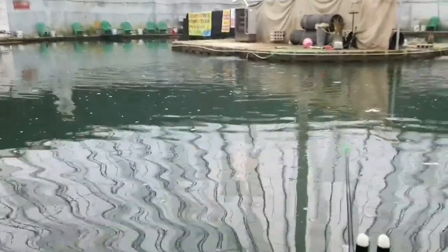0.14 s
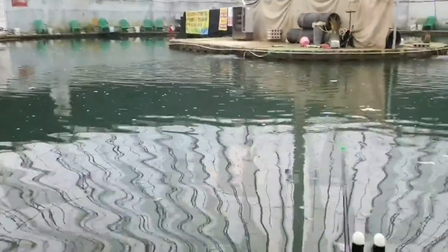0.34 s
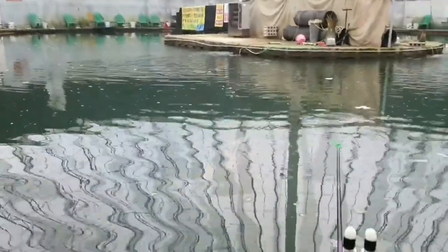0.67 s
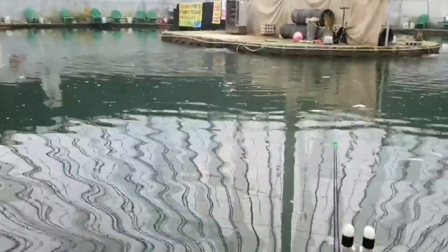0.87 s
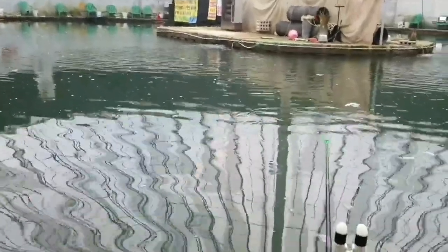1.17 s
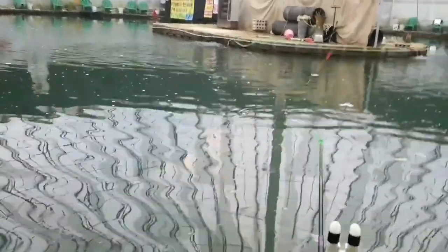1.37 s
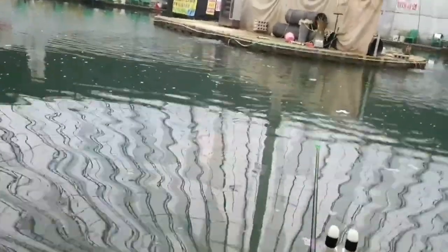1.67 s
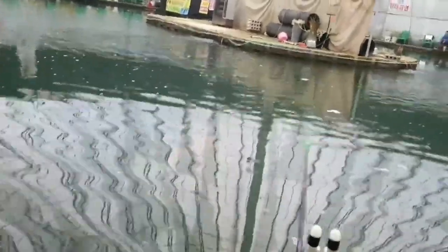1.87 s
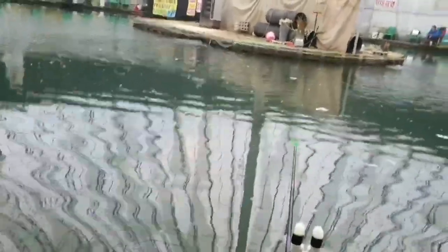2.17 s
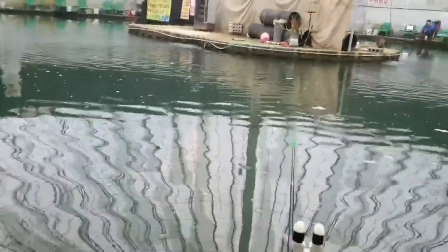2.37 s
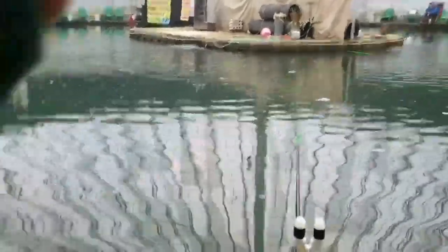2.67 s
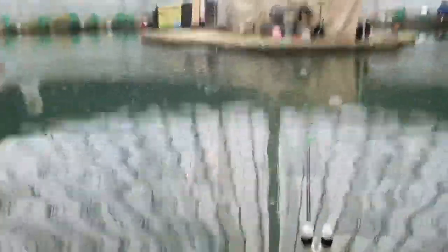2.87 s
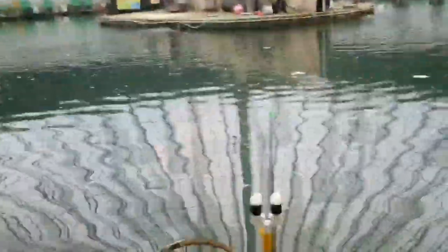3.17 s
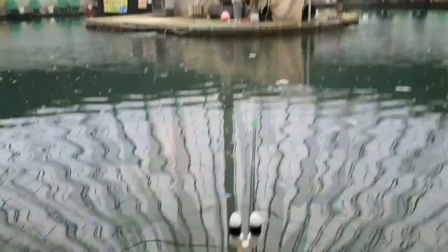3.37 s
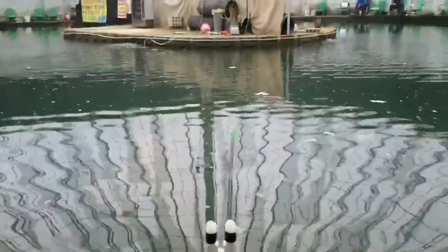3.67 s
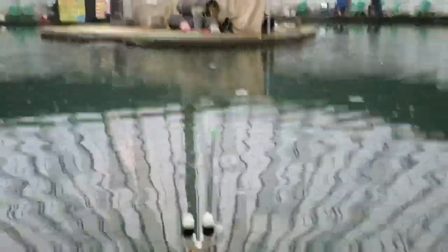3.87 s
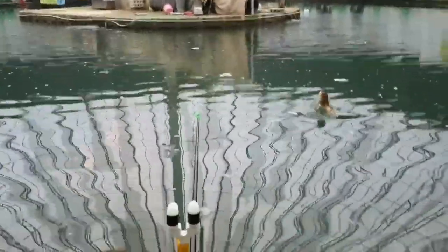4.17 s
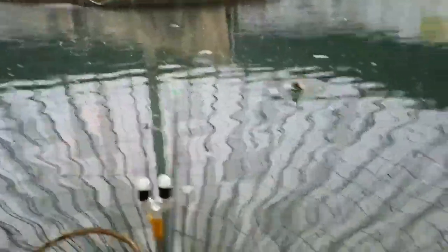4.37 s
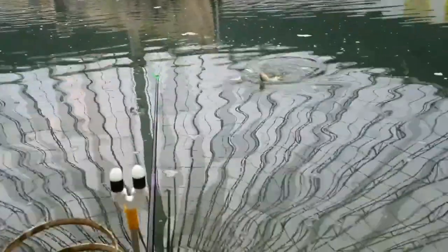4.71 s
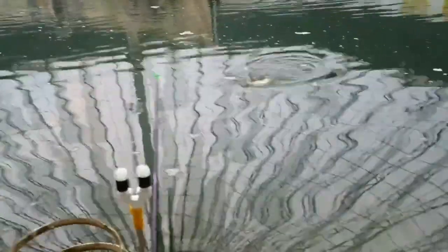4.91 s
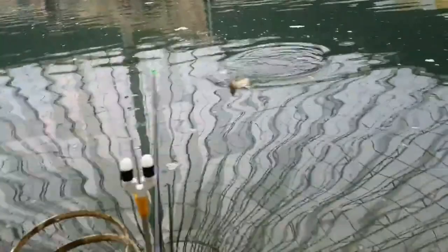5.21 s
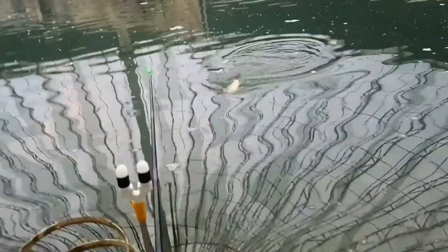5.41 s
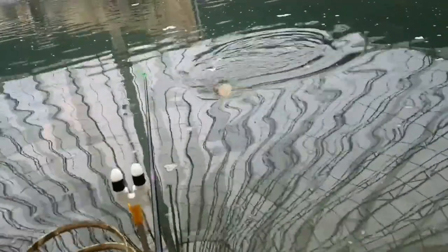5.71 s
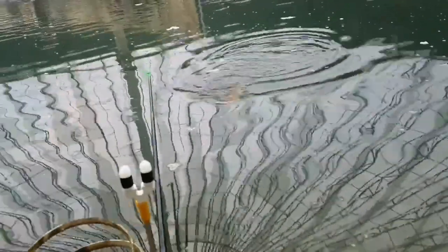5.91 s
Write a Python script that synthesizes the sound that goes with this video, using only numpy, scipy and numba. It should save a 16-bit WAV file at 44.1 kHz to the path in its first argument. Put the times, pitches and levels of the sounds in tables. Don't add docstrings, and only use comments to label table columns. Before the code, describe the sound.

Steady motor hum with watery gurgles and close gulps; a rod handle clacks hard on its wooden stand, a fish flicks water, and drips fall.

```python
import sys
import numpy as np
from scipy import signal
from scipy.fft import rfft, irfft, next_fast_len
from scipy.io import wavfile
from scipy.ndimage import uniform_filter1d
from numba import njit

SR = 44100
rng = np.random.default_rng(int(sys.argv[2]) if len(sys.argv) > 2 else 0)


def makeup_ratio(level_db):
    decades = np.asarray(level_db, float) / 20
    return 10 ** decades


def output_pcm(signal):
    pcm = np.clip(np.atleast_2d(signal).T, -1, 1) * 32767
    wavfile.write(sys.argv[1], SR, np.round(pcm).astype(np.int16))


N = 266820
T = np.arange(N) / SR

# (time [s], left level [dB], right level [dB], bass level [dB])
BLOWS = [
    (3.9123, -12, 5, -1.5),
    (3.9149, 4.5, 11.5, 2),
    (3.919, 7, -41.5, 3.5),
    (3.9219, -50.5, -3, -1.5),
    (3.9263, -6.5, -55.5, -15.5),
    (3.9375, -26.5, -46, -14.5),
]
DRIP_RISE = 1.12


def unit(x):
    return x / np.sqrt(np.mean(x ** 2))


def walk(rate_per_s):
    k = int(SR / rate_per_s)
    held = np.repeat(rng.standard_normal(N // k + 1), k)
    return unit(uniform_filter1d(uniform_filter1d(held, k), k)[:N])


def course(table):
    db = np.interp(T, *np.transpose(table))
    return db - db.mean()


def bell(t, rise_s, fall_s):
    return np.exp(-np.where(t < 0, t / rise_s, t / fall_s) ** 2)


def bumps(rows, rise_s, fall_s):
    s, height_db = np.transpose(rows)[:2, :, None]
    coarse = T[::64]
    return np.interp(T, coarse, (height_db * bell(coarse - s, rise_s, fall_s)).sum(0))


def on_log(table, hz):
    f, v = np.transpose(table)
    return np.interp(np.log(hz), np.log(f), v)


@njit
def chirps(start, size, hz0, hz1, length, n):
    out = np.zeros((2, n))
    for k in range(len(start)):
        phase = 0.
        for i in range(min(int(1.6 * length[k]), n - start[k])):
            u = i / length[k]
            phase += 2 * np.pi * hz0[k] * (hz1[k] / hz0[k]) ** u / SR
            y = np.sin(phase) * min(9 * u, 1.) * np.exp(-2.5 * u ** 3)
            out[0, start[k] + i] += size[k, 0] * y
            out[1, start[k] + i] += size[k, 1] * y
    return out


def bubbles(rows):
    s, db, hz0, hz1, length_s, pan_db = np.transpose(rows)
    size = makeup_ratio(db - 3.5 + np.outer([.5, -.5], pan_db)).T
    return chirps((s * SR).astype(np.int64), size.copy(), hz0.copy(), hz1.copy(), length_s * SR, N)


def air(gain):
    # (pitch [Hz], level [dB])
    side_db = [(60, -14), (110, -22.5), (200, -12.5), (370, -21.5), (690, -6.5), (1270, -2), (2330, -0.5),
               (4290, -1), (7890, 0.5), (14500, 0.5)]
    right_lag_s = 0.00012
    n = next_fast_len(N)
    hz = np.maximum(np.fft.rfftfreq(n, 1 / SR), 1)
    mid, side = rfft(rng.standard_normal((2, n))) * gain(hz)
    side = side * makeup_ratio(on_log(side_db, hz))
    return hz, np.array([mid + side, (mid - side) * np.exp(-2j * np.pi * hz * right_lag_s)])


def ringing(centre_hz, width_hz):
    spectrum = air(lambda f: 1 / (1 + (2 * (f - centre_hz) / width_hz) ** 2))[1]
    return unit(irfft(spectrum, next_fast_len(N))[:, :N])


def breathing_bands(colour, shared_db, own_db, own_per_s):
    lo_hz, hi_hz = colour[0][0], colour[-1][0]
    hz, spectrum = air(lambda f: makeup_ratio(on_log(colour, f)) * (f > lo_hz) * (f < hi_hz))
    out = []
    for centre_hz in lo_hz * 2 ** np.arange(0, np.log2(hi_hz / lo_hz) + .5, .5):
        share = np.clip(1 - 2 * np.abs(np.log2(hz / centre_hz)), 0, 1)
        band = irfft(spectrum * share, next_fast_len(N))[:, :N]
        out.append((centre_hz, band * makeup_ratio(shared_db + own_db * walk(own_per_s))))
    return out


def knock():
    # (pitch [Hz], t60 [s], left level [dB], right level [dB])
    stand = [(78.7, .25, -10, -10.5), (84.3, .047, -7.5, -8.5), (179.6, .149, -24, -27.5),
             (232.9, .122, -24, -21), (263.8, .078, -15.5, -27), (494.5, .049, -5, -.5),
             (493.6, .061, -10, -5), (627.5, .026, -11.5, -9), (760, .055, -34.5, -20.5),
             (754.3, .031, -17.5, -15), (705.4, .005, -6.5, -2), (1211.4, .007, -26, -22.5),
             (49, .046, -28.5, -43), (266.6, .07, -14, -20), (146.1, .112, -30.5, -27.5),
             (962, .035, -31, -37), (499.2, .03, -30.5, -12), (1137, .05, -30, -36), (1335, .035, -33, -35),
             (1470, .03, -38, -39), (1587, .03, -37, -38), (1755, .02, -38, -28), (2055, .014, -31, -31),
             (2345, .02, -36, -30), (2636, .016, -25, -25), (3100, .01, -43, -42)]
    contact_s, hardness, knock_db = .00066, 1.98, .5
    bass_hz, left_lag_s = 330, .00035
    t = np.arange(int(.4 * SR)) / SR
    push = np.sin(np.pi * np.clip(t[:300] / contact_s, 0, 1)) ** hardness
    low = np.array(stand)[:, 0] < bass_hz
    out = np.zeros((2, N))
    for port, lag_s in enumerate((left_lag_s, 0)):
        rings = []
        for k, (hz, t60_s, *mode_db) in enumerate(stand):
            swing = np.sin(2 * np.pi * hz * t) * 1000. ** (-t / t60_s)
            rings.append((-1) ** k * makeup_ratio(mode_db[port]) * swing)
        for s, *blow_db, bass_db in BLOWS:
            ring = np.where(low, makeup_ratio(bass_db), makeup_ratio(blow_db[port])) @ np.array(rings)
            i = round((s + lag_s) * SR)
            out[port, i:i + len(t)] += makeup_ratio(knock_db) * np.convolve(ring, push / push.sum())[:len(t)]
    return out


def crack(left_db, right_db, low_hz, high_hz, rise_s, t60_s):
    t = np.maximum(T - BLOWS[0][0], 0)
    band = signal.butter(2, [low_hz, high_hz], "band", fs=SR, output="sos")
    noise = unit(signal.sosfilt(band, rng.standard_normal((2, N))))
    return makeup_ratio([[left_db], [right_db]]) * noise * np.minimum(t / rise_s, 1) * 1000. ** (-t / t60_s)


def splashes():
    # (time [s], level [dB], centre [Hz], width [Hz], fall [s])
    thrown = [(.51, -59, 9400, 9000, .013), (0.511, -59, 1000, 700, 0.05), (1.8, -68, 2800, 1500, 0.12),
              (2.075, -61, 11500, 4000, .006), (2.264, -56, 700, 500, 0.0044),
              (2.29, -58.5, 9000, 8000, 0.032), (3.385, -62, 12000, 4000, .005),
              (3.536, -55, 1100, 1000, 0.0052), (4.225, -59, 9000, 8000, .003),
              (4.382, -49.5, 3000, 2400, .0025), (4.437, -50, 11000, 7000, 0.0022),
              (4.467, -45, 3400, 3400, 0.0015), (4.481, -53, 6000, 9000, .008),
              (4.493, -50, 9000, 10000, 0.016), (4.505, -57, 7050, 10000, .005),
              (4.644, -48.5, 6300, 2800, 0.004), (4.651, -51, 4800, 2000, .004),
              (4.648, -54, 2100, 900, 0.0027), (4.702, -55, 3000, 2000, .004),
              (4.738, -54, 3200, 2600, .004), (4.765, -59, 3600, 1200, .006), (4.83, -59, 3200, 1200, .004),
              (4.685, -56, 3970, 2800, .008), (4.689, -58, 4200, 3000, .0015),
              (4.482, -51.5, 2390, 1400, 0.017), (4.531, -55, 4200, 1500, 0.0046),
              (4.405, -58, 4200, 1500, .002), (4.338, -50, 2800, 2400, .002)]
    # (time [s], level [dB])
    ticks = [(0.2469, -49), (0.4744, -48), (0.5163, -47), (1.3668, -53), (1.4422, -51), (1.5135, -48),
             (1.6153, -50), (2.0628, -48), (3.3788, -48), (4.2242, -50), (5.7355, -45), (5.8627, -55)]
    tick_db, tick_hz, tick_width_hz, tick_fall_s = -8, 10600, 6500, 0.002
    rise_share = 0.79
    bursts = list(thrown) + [(s, db + tick_db, tick_hz, tick_width_hz, tick_fall_s) for s, db in ticks]
    t = np.arange(int(.16 * SR)) / SR - .05
    out = np.zeros((2, N))
    for s, db, hz, width_hz, fall_s in bursts:
        start = int((s - .05) * SR)
        grain_db = 2.5 * np.repeat(rng.standard_normal(len(t) // 60 + 1), 60)[:len(t)]
        edges_hz = np.clip([hz - width_hz / 2, hz + width_hz / 2], 300, 14500)
        band = signal.butter(2, edges_hz, "band", fs=SR, output="sos")
        drops = signal.sosfilt(band, rng.standard_normal((2, len(t))) * makeup_ratio(grain_db))
        out[:, start:start + len(t)] += makeup_ratio(db + 1.5) * unit(drops) * bell(t, rise_share * fall_s, fall_s)
    return out


def droplets(count, db=-66, spread_db=7, lo_hz=1600, hi_hz=5000, cycles=10, pan_db=12):
    thrash_s, thrash_spread_s = 4.2, .2
    when, pitch, side, loud = rng.random((count, 4)).T
    s = thrash_s + thrash_spread_s * np.log(when / (1 - when)) / 2
    hz = lo_hz * (hi_hz / lo_hz) ** pitch
    size = makeup_ratio(db + spread_db * loud + np.outer([1, -1], pan_db * (side - .5))).T
    start = (np.clip(s, 0, 6) * SR).astype(np.int64)
    return chirps(start, size.copy(), hz, hz * DRIP_RISE, cycles * SR / hz, N)


def drips():
    # (time [s], level [dB], start [Hz], length [s], left minus right [dB])
    on_water = [(2.27, -61, 1200, 0.043, -11), (3.056, -53, 1824, 0.045, 4), (3.126, -59, 1026, 0.062, -6),
                (4.175, -56, 1140, 0.023, 4), (4.325, -58.5, 1240, .015, -1),
                (4.379, -49.5, 1300, .014, -2), (4.452, -43.5, 1950, 0.013, 0),
                (4.465, -51, 1030, 0.018, 0), (4.628, -49, 2330, .008, 0), (4.677, -56, 6000, .006, 0),
                (4.913, -54, 1130, 0.03, -3), (4.996, -55, 990, .012, 2), (5.257, -54, 1070, 0.029, 0),
                (5.271, -56, 1430, .012, 0), (5.273, -55, 1870, 0.032, -2), (5.495, -41.5, 1360, 0.01, 5),
                (5.502, -40.5, 1590, 0.014, 3), (5.754, -40.5, 1820, 0.0086, -1),
                (5.858, -38.5, 1100, 0.0085, -4)]
    # (time [s], level [dB], start [Hz], length [s], left minus right [dB])
    on_foam = [
        (5.25, -56, 1310, 0.012, 2),
        (5.579, -45.5, 1960, 0.0093, 0),
        (5.79, -38.5, 1680, 0.0052, 3),
        (5.814, -53, 1480, .012, 0),
    ]
    foam_fall = 0.81
    return bubbles([(s, db, hz, hz * glide, length_s, pan_db)
                    for table, glide in ((on_water, DRIP_RISE), (on_foam, foam_fall))
                    for s, db, hz, length_s, pan_db in table])


def gulps():
    # (time [s], level [dB], start [Hz], length [s])
    closing = [
        (.645, -30, 358, 0.0058),
        (1.288, -28, 284, 0.011),
        (2.258, -38, 445, 0.022),
        (5.4, -31, 292, 0.013),
        (5.412, -36.5, 400, 0.025),
        (5.706, -33, 217, 0.023),
    ]
    # (time [s], level [dB], start [Hz], length [s])
    glugs = [
        (.3, -33, 200, 0.04),
        (.416, -40.5, 409, 0.044),
        (1.51, -39.5, 426, 0.093),
        (3.533, -35, 563, 0.018),
        (3.587, -41, 417, 0.13),
        (5.66, -39.5, 436, 0.053),
    ]
    # (time [s], level [dB], start [Hz], length [s])
    quick = [
        (2.694, -46, 470, 0.045),
        (2.8, -48.5, 590, 0.03),
        (4.91, -41.5, 420, .04),
    ]
    # (time [s], level [dB], start [Hz])
    burbles = [(0.119, -33, 288), (0.557, -35, 297), (0.721, -36, 301), (0.782, -38.5, 282),
               (0.905, -36, 250), (1.007, -31, 277), (1.067, -32.5, 302), (1.21, -33, 287),
               (1.289, -38, 297), (1.373, -32, 288), (1.621, -38, 266), (2.031, -39, 300),
               (2.091, -37, 273), (2.231, -50, 270), (2.367, -30, 267), (2.601, -42, 270),
               (2.682, -33, 247), (2.763, -32, 251), (2.914, -35.5, 307), (3.148, -33, 274),
               (3.212, -36, 290), (3.397, -26.5, 258), (3.478, -46, 256), (3.55, -33.5, 285),
               (3.669, -32, 293), (3.723, -32, 254), (4.057, -32, 265), (4.211, -34, 287),
               (4.32, -37.5, 282), (4.44, -43, 293), (4.642, -41, 250), (4.716, -32, 244),
               (4.788, -38, 304), (4.937, -32.5, 270), (5.181, -31, 261), (5.276, -39, 281),
               (5.596, -35, 253), (5.706, -38, 247), (5.783, -35, 240), (5.988, -36, 253)]
    burble_db, burble_s, burble_rise = -2, .028, 1.13
    big = [(s, db, hz, hz * 2 ** (oct_per_s * length_s), length_s, .5)
           for table, oct_per_s in ((closing, 22), (glugs, 3.63)) for s, db, hz, length_s in table]
    big += [(s, db + burble_db, hz, hz * burble_rise, burble_s, .5) for s, db, hz in burbles]
    small = [(s, db, hz, hz * 2 ** (25.8 * length_s), length_s, 0) for s, db, hz, length_s in quick]
    wobble = makeup_ratio(2 * (np.minimum(walk(130.), .7) - 0.53))
    return wobble * bubbles(big) + bubbles(small)


def pings():
    # (time [s], level [dB], pitch [Hz])
    struck = [(.43, -53, 2630), (.433, -51, 3100), (.945, -55, 2840), (.95, -55, 3350), (1.685, -54, 2920),
              (1.75, -56, 2770), (1.809, -56, 2520), (1.44, -57, 2890), (1.017, -55, 2960),
              (1.096, -55, 2080), (1.142, -51, 2915), (2.47, -47, 2830), (4.525, -53, 2720),
              (4.552, -54, 2720), (4.578, -58, 2750), (4.66, -59, 2690), (4.73, -54, 2730),
              (4.732, -54, 2010), (4.757, -56, 1940), (4.783, -57, 3120), (4.803, -55, 2130),
              (4.478, -52, 4600), (4.39, -55, 2700)]
    length_s, rise = 0.029, 1.012
    return bubbles([(s, db, hz, hz * rise, length_s, -1.3) for s, db, hz in struck])


def hoots():
    # (time [s], level [dB], length [s])
    blown = [(1.386, -44.5, 0.056), (1.703, -47, 0.043), (1.831, -46, 0.036), (2.262, -43, 0.026),
             (2.35, -42, 0.054), (2.534, -44, 0.1), (2.599, -47, 0.044), (2.736, -42.5, 0.037),
             (3.561, -45, 0.023), (3.667, -45, 0.052), (4.671, -47, 0.04), (5.495, -43, 0.05),
             (5.628, -50, .03)]
    hoot_hz = 589
    return bubbles([(s, db, hoot_hz, hoot_hz, length_s, -1) for s, db, length_s in blown])


def gurgle(count, lo_hz, hi_hz, db, cycles, rise, spread_db, pan_db):
    when, pitch, glide, side, loud = rng.random((count, 5)).T
    hz = lo_hz * (hi_hz / lo_hz) ** pitch
    size = makeup_ratio(db + spread_db * loud + np.outer([1, -1], pan_db * (side - .5))).T
    return chirps((when * N).astype(np.int64), size.copy(), hz, hz * (1 + rise * glide), cycles * SR / hz, N)


def spray():
    # (pitch [Hz], density [dB per Hz])
    spray_colour = [(530, -15), (900, -7), (1170, -7), (1360, -5), (1800, -4), (2150, -4), (2820, -1),
                    (4200, -5), (7050, -11.5), (8810, -7.5), (11400, -9), (13900, -12.5), (15000, -20)]
    # (time [s], level [dB])
    flow = [(0, -1.5), (.5, 0), (.72, 0.5), (1.15, 1.5), (1.33, -4.5), (1.5, -0.5), (1.9, 2), (2.2, 0.5),
            (2.98, 0), (3.1, 4), (3.55, 2.5), (3.9, 4), (4.55, 4.5), (5.05, 0), (5.44, -2), (5.55, 2),
            (5.85, -1.5), (6.05, -3)]
    # (time [s], level [dB], share in the hiss [0-1])
    gushes = [(.01, 6, 0.3), (.24, 2.5, 0), (.33, 2, 1), (.44, 4.5, 0), (.96, 1, 0.7), (1.05, 3, 0.2),
              (1.1, 0.5, 1), (1.19, 2.5, 1), (1.36, 1.5, 1), (1.44, 2, 0.9), (1.8, 2.5, 0.5), (1.95, 0, 1),
              (2.15, -2, 0.8), (2.28, 1.5, 1), (2.48, 5, 0.5), (2.58, 3.5, 1), (2.72, 3.5, 0.4),
              (2.8, 2.5, 1), (2.93, 2.5, 0), (3.08, 3, 0.1), (3.21, 4.5, 0.1), (3.6, -0.5, 0.1),
              (3.68, 2, 0.8), (3.9, 2, 0.9), (4, 0, 1), (4.1, 0.5, 1), (4.2, -4.5, 0.7), (4.26, -0.5, 1),
              (4.35, 0, 0.1), (4.66, 1.5, 0.2), (4.8, -1, 0.6), (5.2, 3, 0.5), (5.51, 3.5, 0.8),
              (5.58, 1, 1), (5.78, 0.5, 0.8), (5.95, 4, 0.5)]
    rise_s, fall_s = 0.043, 0.047
    pipe_hz, pipe_width_hz = 2720, 310
    split_hz, flicker_hz = 4800, 12000
    flow_db = course(flow)
    slosh = walk(25)
    slosh_db = 2 * (slosh - uniform_filter1d(slosh, size=SR // 6))
    patter_db = 0.84 * flow_db + bumps(gushes, rise_s, fall_s)
    hiss_db = 1.06 * flow_db + bumps([(s, db * share) for s, db, share in gushes], rise_s, fall_s)
    bands = breathing_bands(spray_colour, 0.36 * walk(15.0), own_db=-0.16, own_per_s=23.0)
    pipe = makeup_ratio(-13.5 + 4.2 * walk(28.)) * ringing(pipe_hz, pipe_width_hz)
    patter = unit(sum(b for hz, b in bands if hz < split_hz)) + pipe
    hiss = sum(b * makeup_ratio((hz > flicker_hz) * 3 * walk(18.)) for hz, b in bands if hz >= split_hz)
    return (patter * makeup_ratio(patter_db + 0.35 * slosh_db - 60.0)
            + unit(hiss) * makeup_ratio(hiss_db + .6 * slosh_db - 60.5))


def surge(db, steady_db):
    return np.sqrt(makeup_ratio(db) ** 2 + makeup_ratio(steady_db) ** 2)


def whine():
    whine_hz, left_db, left_lag_rad = 838.4, -11, 1.24
    whine_db, turn_db, turn_at_s, turn_length_s = -59, -2, 3.3, 0.13
    phase = 2 * np.pi * whine_hz * T + 0.91 * walk(6.)
    ports = np.array([makeup_ratio(left_db) * np.sin(phase - left_lag_rad), np.sin(phase)])
    turned = .5 + .5 * np.tanh((T - turn_at_s) / turn_length_s)
    return ports * makeup_ratio(whine_db + turn_db * turned + 0.93 * walk(3.5) + 1.7 * walk(25.))


def drone():
    # (pitch [Hz], density [dB per Hz])
    drone_colour = [(12, -54), (20, -21), (53, -3), (103, 1), (125, 2), (160, -9.5), (283, 2), (400, -13),
                    (540, -21.5), (690, -22), (930, -28.5), (1400, -33), (1820, -32.5), (3080, -100)]
    # (pitch [Hz], width [Hz], level [dB])
    ducts = [(67.8, 1.8, -75), (118, 9.9, -54.5), (274, 160, -64), (453, 20, -65), (490.7, 27, -62),
             (591.5, 34.5, -57), (654, 20, -101)]
    # (time [s], level [dB])
    load = [(0, 1.5), (.3, -1), (.6, 1), (.95, 3), (1.4, -1), (1.95, -0.5), (2.3, -1), (2.52, 0.5),
            (2.95, 1.5), (3.12, 3.5), (3.4, 0.5), (3.85, 2), (4.17, -1), (4.3, -1.5), (5.05, -2.5),
            (5.35, -0.5), (5.7, 0.5), (6.05, 1)]
    # (time [s], level over the steady tone [dB])
    puffs = [(.05, -3), (.13, -2.5), (.21, -0.5), (.38, 1), (.85, -0.5), (1.42, 1.5), (1.7, 0.5),
             (2.3, 3.5), (2.56, -5), (2.63, -0.5), (2.85, 2), (3.07, 5), (3.58, 3), (4.23, 3.5), (4.7, 2),
             (5.15, -2), (5.52, 3), (5.75, 5), (5.95, 2)]
    deep_hz, low_hz = 170, 370
    buffet_db, buffet_per_s = 0.5, 12
    load_db = course(load)
    deep = makeup_ratio(0.5 * load_db + 0.53 * buffet_db * walk(buffet_per_s) - 0.36)
    low = surge(1.78 * load_db + buffet_db * walk(buffet_per_s) - 1.0, steady_db=-3.0)
    high = makeup_ratio(bumps(puffs, rise_s=0.046, fall_s=0.052) + 1.0 * walk(14.) - 2.0)

    def follow(hz):
        return deep if hz < deep_hz else low if hz < low_hz else high

    bands = breathing_bands(drone_colour, 0.52 * walk(15.0), own_db=1.5, own_per_s=8.)
    bass_rms = np.sqrt(np.mean(sum(b for hz, b in bands if hz < low_hz) ** 2))
    out = makeup_ratio(-44.5) / bass_rms * sum(b * follow(hz) for hz, b in bands)
    for centre_hz, width_hz, db in ducts:
        out = out + makeup_ratio(db) * ringing(centre_hz, width_hz) * follow(centre_hz)
    return out + whine()


def hall(x, t60_s=0.17, db=-22):
    t = np.arange(int(.6 * SR)) / SR
    tail = rng.standard_normal((2, len(t))) * 1000. ** (-t / t60_s) * (t > .012)
    tail = tail / np.sqrt(np.sum(tail ** 2) / 2)
    return x + makeup_ratio(db) * signal.fftconvolve(x, tail, axes=1)[:, :N]


def scene():
    rattle = (crack(left_db=-34.5, right_db=-36, low_hz=900, high_hz=2630, rise_s=0.0078, t60_s=0.062)
              + crack(left_db=-48, right_db=-21, low_hz=150, high_hz=675, rise_s=0.0019, t60_s=0.076))
    wood = hall(knock() + rattle, t60_s=0.27, db=-26)
    water = hall(splashes() + droplets(count=200) + drips() + gulps() + pings() + hoots())
    glugs = gurgle(count=300, lo_hz=200, hi_hz=604, db=-66.5, cycles=14.0, rise=0.25,
                   spread_db=13.5, pan_db=-8.5)
    trickle = gurgle(count=1500, lo_hz=1707, hi_hz=4210, db=-75.5, cycles=62.6, rise=0.045,
                     spread_db=10.0, pan_db=13.0)
    fizz = gurgle(count=2500, lo_hz=4298, hi_hz=13500, db=-77.5, cycles=66, rise=0.038,
                  spread_db=10.5, pan_db=17.5)
    left_minus_right_db = -0.7
    balance = makeup_ratio([[left_minus_right_db / 2], [-left_minus_right_db / 2]])
    bed = (drone() + spray() + fizz + hall(glugs + trickle, db=-0.5)) * balance
    return wood + water + bed


def top_cut(x):
    return signal.sosfilt(signal.butter(12, 15110, fs=SR, output="sos"), x)


def record(dry):
    heard = signal.sosfilt(signal.butter(2, 38, "high", fs=SR, output="sos"), dry)
    heard = signal.sosfilt(signal.ellip(8, .5, 50, 14520, fs=SR, output="sos"), heard)
    return top_cut(heard)


dry = scene()
out = record(dry)
output_pcm(out)
```